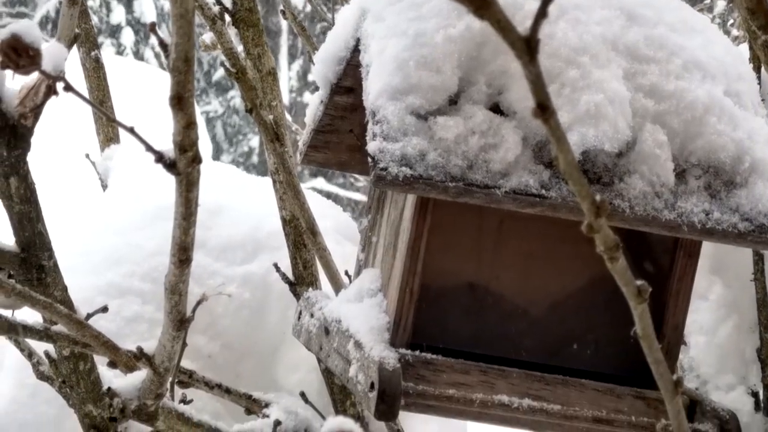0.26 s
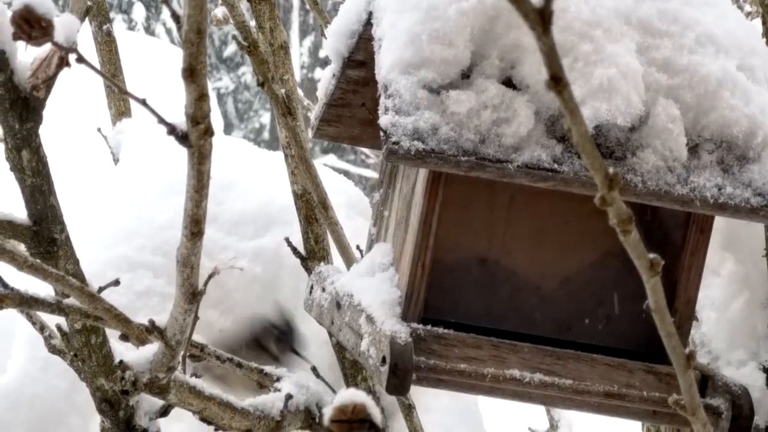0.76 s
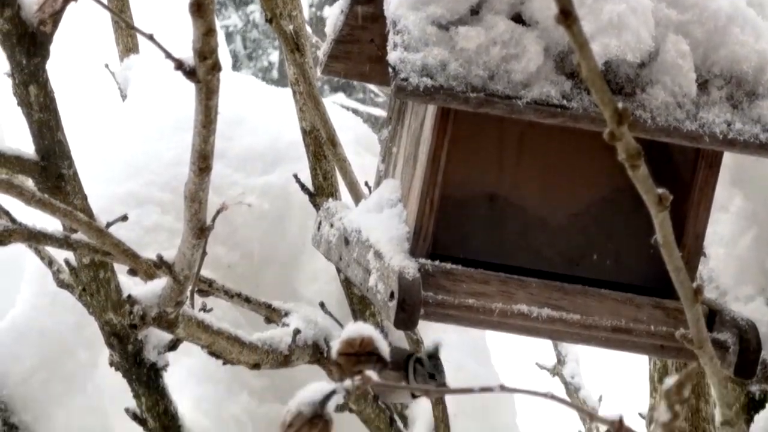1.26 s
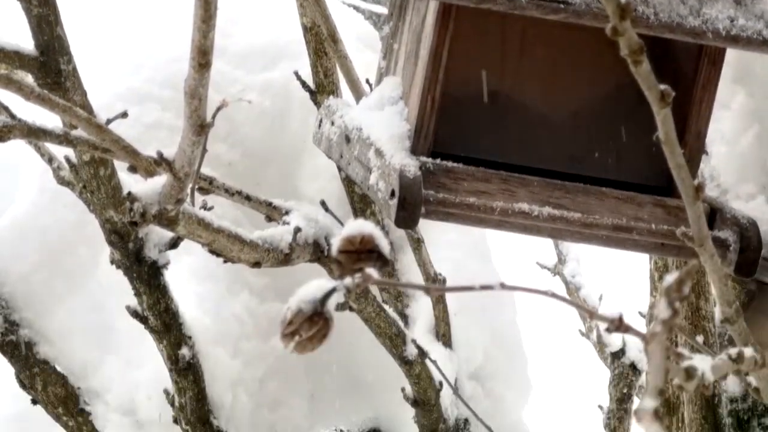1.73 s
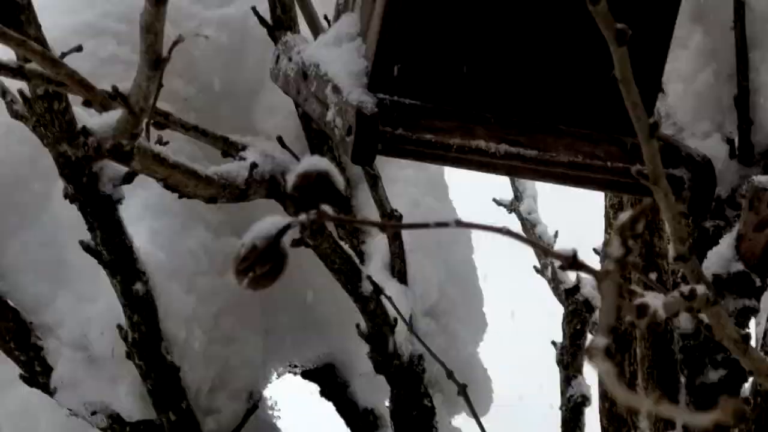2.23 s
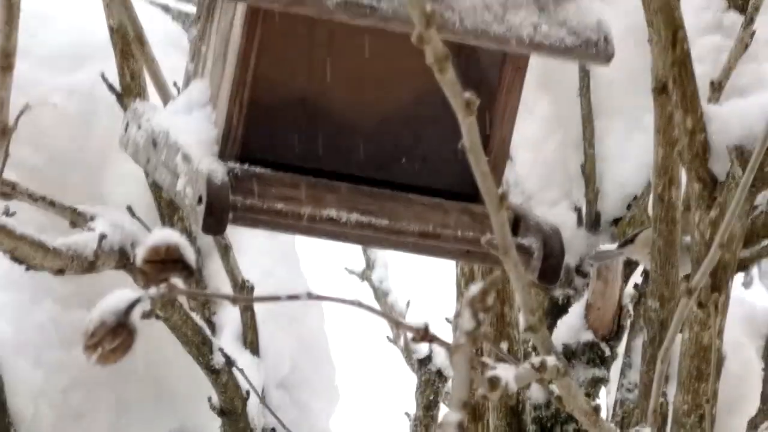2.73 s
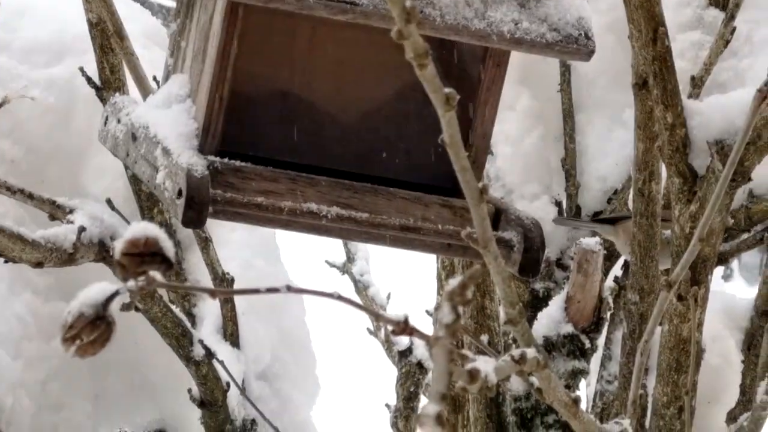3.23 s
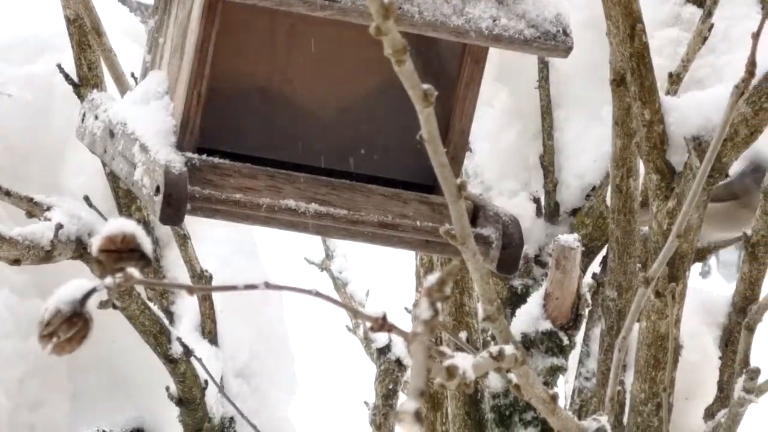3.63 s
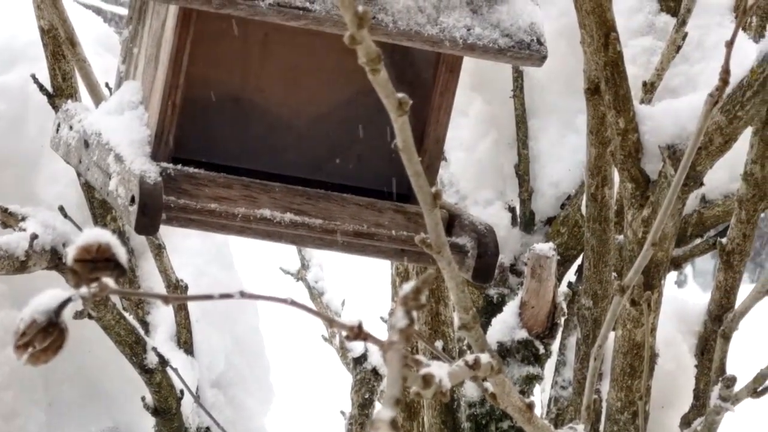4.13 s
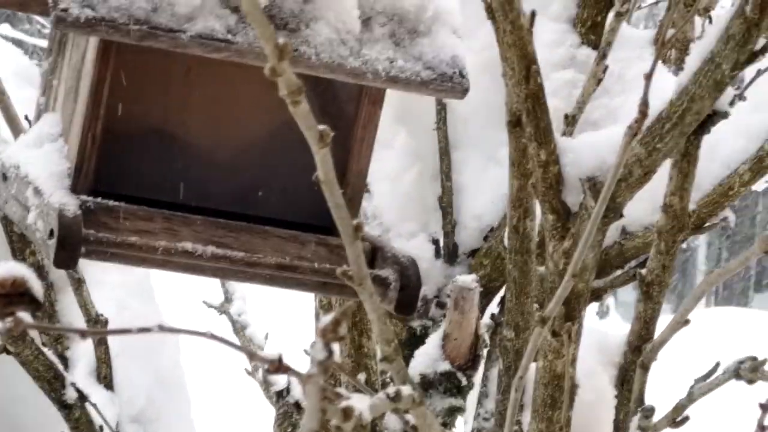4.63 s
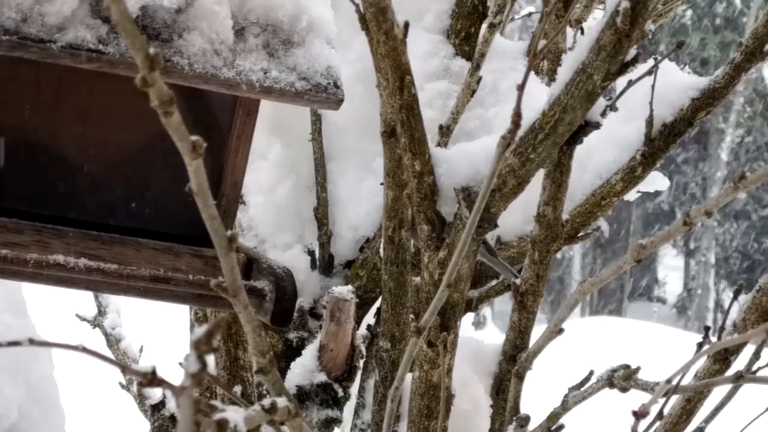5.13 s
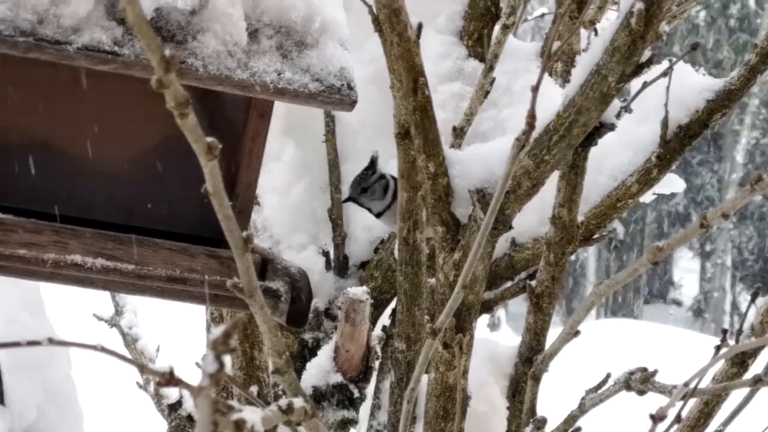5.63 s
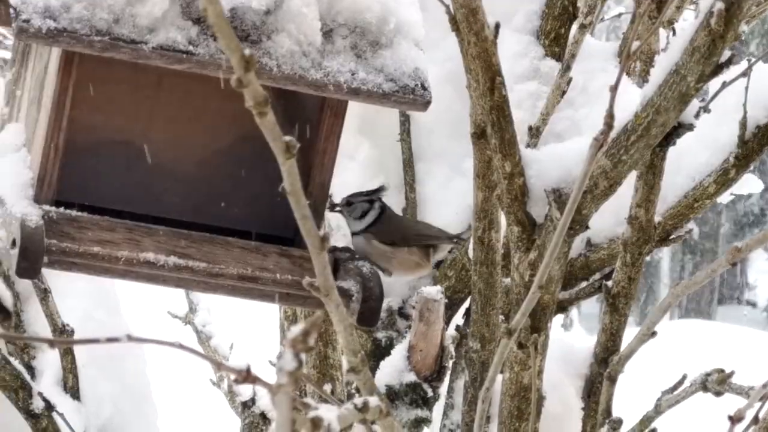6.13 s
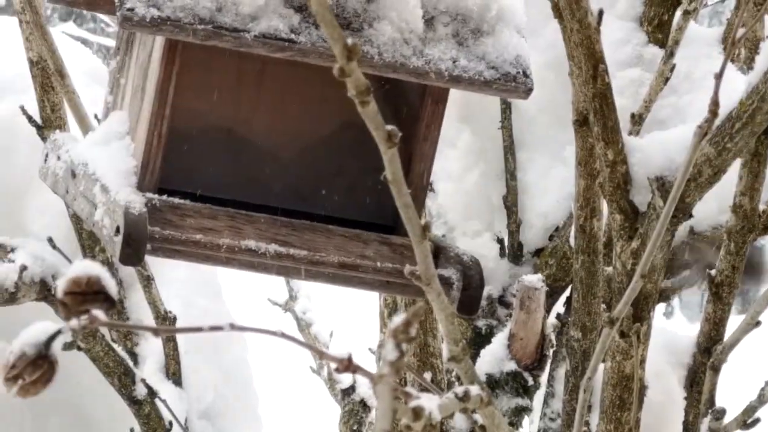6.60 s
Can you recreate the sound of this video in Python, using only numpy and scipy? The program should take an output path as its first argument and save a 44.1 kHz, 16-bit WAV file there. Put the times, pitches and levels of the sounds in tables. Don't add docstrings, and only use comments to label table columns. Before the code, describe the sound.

Close to a small stereo microphone, a bird trills quickly twice: eight notes at the very start, then a stronger run of thirteen near the middle, leaning right. Between and after come sparse distant whistles, churrs, tiny twig ticks, soft knocks, faint wing flutters and dull low pops on the left. Gentle wind rumble, far cars and steady hiss lie beneath, with a short outdoor echo.

```python
import sys
import numpy as np
from scipy import signal
from scipy.fft import rfft, irfft, next_fast_len
from scipy.io import wavfile
from scipy.ndimage import uniform_filter1d

SR = 44100
rng = np.random.default_rng(int(sys.argv[2]) if len(sys.argv) > 2 else 0)


def how_loud(loudness_db):
    steps = np.asarray(loudness_db, float) / 20
    return 10 ** steps


def dump(signal):
    limited = np.clip(np.atleast_2d(signal).T, -1, 1)
    pcm = np.round(limited * 32767).astype(np.int16)
    wavfile.write(sys.argv[1], SR, pcm)


N = 302526

# (frequency [Hz], density [dB per Hz])
HISS_SPECTRUM = [(88, -0.5), (150, -1.5), (405, -7), (881, -14), (1850, -14.5), (2200, -19), (2780, -15),
                 (3720, -19.5), (4790, -11.5), (6290, -20.5), (7640, -17), (9840, -36), (10800, -29.5),
                 (13200, -19), (15700, -18)]
# (frequency [Hz], correlation [-1..1])
PORT_LIKENESS = [(60, 0.21), (300, 0.42), (700, 0.094), (15000, .01)]
# (frequency [Hz], density [dB per Hz])
ROAD_SPECTRUM = [(150, -5), (400, -5.5), (800, -1), (1300, -12.5), (1900, -9), (2600, -19.5), (5000, -38)]
# (time nearest [s], level [dB], time to draw away [s])
PASSES = [
    (1.2, -73, 0.18),
    (2.35, -64, 0.53),
    (3.7, -74, 0.46),
    (4.8, -67, 0.32),
    (5.92, -60, 0.3),
    (6.8, -71, 1),
]
# (frequency [Hz], density [dB per Hz])
GUST_SPECTRUM = [(8, 1), (20, 1.5), (50, -8.5), (120, -11), (300, -39.5), (800, -46), (3000, -59)]
# (time strongest [s], level [dB], time to die away [s])
GUSTS = [(.6, -66, 0.62), (1.55, -62.5, 0.44), (2.6, -66.5, 0.96), (3.48, -51.5, 0.055),
         (3.86, -59.5, 0.075), (4.55, -60, 0.036), (4.8, -56, 0.14), (5.4, -67, 0.83), (6.1, -63, 0.062),
         (6.4, -64, 0.14), (6.86, -53, 0.1)]
# (frequency [Hz], density [dB per Hz])
RUB_SPECTRUM = [(15, -8), (50, 0.), (120, -6), (280, -16), (500, -30), (1000, -35), (3000, -50),
                (8000, -62)]
# (time [s], length [s], level [dB], left-right [dB])
HANDLING = [
    (3.43, 0.12, -50.5, 3.5),
    (4.1, 0.15, -63.5, 0),
    (1.1, 0.053, -63.5, 7),
    (3.81, 0.09, -57, -1),
    (6.72, 0.078, -73, -3),
]

# (time [s], peak [dB], ring [Hz], left-right [dB])
KNOCKS = [
    (1.435, -63, 601, 4),
    (1.599, -59.5, 680, 15),
    (1.685, -58.5, 888, 7),
    (1.865, -52, 795, 16.5),
    (1.921, -50.5, 960, -7.5),
    (4.908, -63, 559, -6),
]
# (time [s], peak [dB], left-right [dB])
TICKS = [(1.2865, -79, 3), (2.1243, -69, -1), (2.639, -59.5, 16), (2.676, -57, 16), (2.7136, -52, 14),
         (2.803, -63, 12), (2.95, -69, 0), (3.354, -68, 0), (2.817, -63, 17), (2.9966, -66, -2.0),
         (3.1447, -66, 3), (3.159, -63, 0), (1.875, -64, 0), (3.374, -63, 6), (3.437, -63, -1),
         (3.464, -60, -11), (3.5073, -56.5, 6), (3.5638, -65, 9), (3.5917, -66, -1.0), (4.612, -68, 3),
         (4.85, -63, 1), (4.96, -60, 1), (5.075, -59, 3), (5.13, -65, 1), (5.6435, -65, -6), (5.75, -67, 0),
         (5.886, -61, 1), (6.418, -60, 4)]
# (time [s], peak [dB], ring [Hz])
POPS = [(0.196, -55, 100), (1.254, -42.5, 117), (1.341, -37, 134), (1.555, -35.5, 141), (1.824, -38.5, 140),
        (1.892, -48.5, 159), (2.349, -42.5, 135), (2.458, -47, 152), (2.624, -52, 158), (3.142, -50, 181),
        (4.529, -40.5, 154), (4.605, -38, 146), (5.856, -49.5, 138), (6.411, -45.5, 134.3),
        (6.45, -44, 164)]

# (frequency [Hz], gain [dB])
PORT_COLOUR = [(1500, 5), (2200, 1.5), (3000, 8.5), (3900, 0), (4800, 11), (6200, 5), (7500, -3),
               (8200, -7), (8800, -26), (10300, -27), (11500, -21.5), (14000, -12)]
# (delay [s], left [dB], right [dB])
ECHOES = [(.0031, -3, -51), (.009, -14.5, -43), (.016, -12, -25), (.026, -17.5, -25)]
PORT_LAG_SAMPLES = 20

# (time [s], length [s], level [dB], left-right [dB])
FLUTTER = [
    (0.801, 0.034, -68.5, 0),
    (1.729, 0.2, -69.5, 3),
    (4.83, 0.36, -71.5, 0),
    (6.383, 0.062, -68, 1),
]
# (time [s], length [s], top [Hz], level [dB], left-right [dB])
ARCHES = [
    (0.804, 0.021, 1915, -70, 1),
    (2.404, .085, 4600, -74, 0),
    (3.08, 0.086, 4910, -59, -16),
    (4.56, 0.14, 6140, -77.5, -6),
    (5.948, 0.1, 4930, -68.5, -9),
    (5.775, 0.048, 4660, -76, -4),
]
ARCH_START, ARCH_END = 0.95, .91
ARCH_TOP_AT, ARCH_FADE_DB = 0.35, -3.5
# (time [s], length [s], from [Hz], to [Hz], level [dB])
THIN = [
    (1.942, 0.21, 6200, 7850, -69.5),
]
QUICK = [(1.35, 0.04, 7600, 4200, -71), (1.665, 0.066, 7100, 6390, -62), (5.03, 0.04, 3500, 4780, -70),
         (5.31, 0.048, 4460, 4910, -62), (4.84, 0.023, 4440, 4840, -68), (5.368, 0.035, 4250, 4690, -66.5),
         (6.487, 0.049, 3940, 4170, -63.5), (2.128, .04, 4070, 4500, -76), (5.448, 0.17, 7580, 7050, -70.5),
         (6.718, 0.034, 5310, 4880, -56), (6.8, 0.055, 5200, 4720, -73)]
RISING = [
    (1.8, .075, 1630, 2010, -74.5),
    (1.82, .02, 4800, 5100, -60),
    (1.77, .045, 3700, 4300, -70),
    (5.7, 0.042, 2850, 3900, -70),
    (4.94, 0.045, 3050, 3500, -69),
    (4.875, .05, 2950, 3200, -73),
    (4.98, .05, 3500, 3900, -74),
    (6.53, 0.041, 4150, 4280, -63.5),
    (2.265, .035, 4400, 4000, -77),
]
RIGHT = [(1.18, .05, 7200, 7100, -73.5), (1.72, 0.098, 6450, 5650, -66), (1.815, .018, 6200, 4950, -63),
         (1.636, 0.015, 7700, 7000, -71), (3.162, 0.07, 4400, 4330, -61.5),
         (3.217, 0.043, 4220, 4150, -66.5), (3.19, .03, 4400, 4780, -72), (6.565, 0.049, 4260, 4080, -73.5),
         (4.59, 0.13, 4980, 4880, -75), (3.605, .08, 4550, 4700, -77), (2.47, .13, 7850, 7700, -82),
         (4.52, .02, 7000, 6200, -72)]
LEFT = [(1.487, 0.056, 4570, 3200, -70.5), (1.678, 0.064, 5400, 5300, -67.5),
        (1.805, 0.11, 4860, 4820, -66.5), (1.74, 0.068, 5080, 4930, -66), (1.85, 0.04, 5550, 5800, -66),
        (1.872, .014, 4540, 4400, -73), (2.053, .016, 4050, 4000, -76), (1.92, .1, 4810, 4720, -74),
        (2.165, 0.084, 4490, 4400, -77), (2.551, 0.099, 3990, 4360, -78), (3.302, 0.04, 3290, 3190, -68.5),
        (4.851, 0.013, 4300, 3650, -62), (5.305, .06, 4050, 3890, -69), (5.35, 0.025, 4500, 4330, -65),
        (4.98, .045, 1827, 1866, -79), (5.03, .035, 1950, 2600, -78), (5.055, .08, 4770, 4720, -72),
        (5.065, 0.062, 2630, 2720, -73), (5.42, 0.031, 3180, 2990, -65.5), (6.69, 0.022, 5080, 4720, -60.5),
        (6.762, 0.021, 4600, 5210, -61)]
CHURRS = [(0.799, 0.075, 7200, 7500, -71.5), (.803, 0.0254, 3400, 4400, -65), (1.5, 0.057, 4700, 3800, -72),
          (1.742, 0.046, 3500, 3800, -70), (1.74, 0.2, 5800, 5400, -65.5), (1.67, .11, 6900, 6700, -76),
          (5.19, .035, 4850, 4850, -71), (3.451, 0.14, 7600, 7260, -71), (4.839, 0.41, 4860, 4900, -73),
          (6.392, 0.05, 5390, 4750, -61.5), (6.44, .05, 4300, 4250, -65.5), (6.395, .1, 5550, 5350, -69),
          (6.5, 0.078, 5400, 5700, -73), (5.39, .04, 4600, 4800, -72), (6.68, 0.047, 4900, 4800, -65)]
# (haste [1 = even glide], fade over the call [dB], left-right [dB])
MANNERS = [
    (26, -12, -17),
    (3.5, -6, -6.5),
    (0.547, -4, 5),
    (0.79, -1.5, -10),
    (1.06, -6.5, 11.5),
    (1.2, -9.5, -7),
]
# (frequency [Hz], density [dB per Hz])
BUZZ_SPECTRUM = [(2500, -28), (3900, -15), (4450, -2), (4800, -2.5), (5200, -11), (6300, -13), (6900, -24),
                 (7350, 0.5), (7750, -10), (8300, -13.5), (8900, -24), (10000, -37), (14000, -31)]
BUZZ_DB, BUZZ_SAG_S, BUZZ_SAG_DB_PER_S = -57, 0.43, 30
BUZZ_END_S, BUZZ_CUT_DB_PER_S = 0.534, 1600

# (time [s], left-right [dB])
PERCH = [
    (0, -2),
    (.12, -5),
    (.8, -2.5),
    (2.3, 12),
    (3.25, -4),
    (3.73, -1.5),
    (3.9, -17),
    (6.86, -30.5),
]
# (time [s], length [s], start [Hz], top [Hz], level [dB])
CHIPS = [
    (3.242, 0.0206, 4770, 7070, -41),
    (6.614, 0.0305, 6820, 7560, -45.5),
]
# (share of length, share of the bend, level [dB])
CHIP_SHAPE = [(0, 0, -7), (.12, 0.71, -7), (.3, 0.98, -4), (.6, 0.81, -6), (.82, .45, -7.5), (1, 0, -18)]
# (time [s], length [s], top [Hz], level [dB])
SEEPS = [
    (0.715, 0.034, 7700, -56.5),
    (5.784, 0.044, 8820, -70),
    (6.119, 0.078, 8350, -63),
    (6.232, 0.054, 8340, -63.5),
    (6.365, 0.056, 8490, -66),
    (6.673, 0.028, 7770, -66),
]
SEEP_SHAPE = [(0, 0, -4), (.1, .75, -6.5), (.22, 1, -6), (.62, 0.83, -4), (.85, .55, -4), (1, 0, -13)]
CHIP_END, SEEP_START, SEEP_END = 0.854, 0.77, .885
# (time [s], length [s], from [Hz], to [Hz], level [dB])
GRACE = [
    (3.729, 0.0167, 2260, 2820, -58),
    (3.766, 0.024, 2440, 2880, -55),
    (6.026, 0.043, 7760, 8230, -69.5),
    (1.815, .021, 3250, 3320, -67),
    (1.833, .044, 3340, 4130, -66),
    (3.256, .009, 6890, 5520, -52),
]
LIFTS = [
    (2.33, .026, 6900, 7900, -65),
    (5.949, 0.033, 7200, 8600, -71.5),
]

# (time of arch top [s], level [dB], top pitch [Hz], rasp under the note [dB])
TRILL = [(0.0469, -39.5, 3563, -14), (0.0923, -38.5, 3590, -8.5), (0.1387, -39, 3750, -8),
         (0.1888, -37.5, 3780, -4.5), (0.2434, -38.5, 3690, -10), (0.299, -38.5, 3780, -8),
         (0.3576, -38.5, 3724, -6), (0.421, -36.5, 3653, -14), (3.745, -37.5, 3655, -23.5),
         (3.7874, -34.5, 3500, -13), (3.8305, -34, 3640, -13), (3.877, -33, 3750, -10),
         (3.9308, -32.5, 3730, -6), (3.9896, -32, 3886, -10), (4.043, -31.5, 3960, -9.5),
         (4.104, -32.5, 3790, -9.5), (4.1663, -32.5, 3864, -13.5), (4.2282, -33.5, 3790, -9),
         (4.2905, -33, 3764, -11.5), (4.355, -32.5, 3835, -7.5), (4.426, -34, 3707, -11)]
BRIGHT_DB = [6, 3, -3, 3, 0, 11, 6, 6, 8.5, 3, 6.5, 1, 4, 2, -7, -6, -7, -11, -5, 3, 8]
CLIMB_STRETCH = [1.35, 1.1, 1.01, 1.05, .95, 1.01, .95, 1.1, 1.024, 1.08, 1.056, 1.1, 1.08, 1.08, 1.01,
                 1.08, 1.05, 1.09, 1.08, 1.12, 1.1]
SNAPS_DB = [-11, -13, -19, -11, -13, -6, -14, -7, -15, -18, -13, -18, -14, -16, -21, -20, -19, -24, -20, -9,
            -6]
# (multiple of pitch, level [dB])
TRILL_PARTIALS = [(.5, -34.5), (1.5, -26.5), (2, -23.5), (3, -18.5), (3.5, -29), (4, -27.5)]
# (frequency [Hz], extra left-right [dB])
LEANS = [
    [(3000, -1.1), (4000, -2.5), (4800, -4.5), (6000, 0), (9000, 3)],
    [(3000, 0.3), (4000, 0.5), (4600, 6), (5500, 6), (7000, 2.5), (10000, 4.5)],
]
FALL_S, FALL_SHARE, FIRST_FALL_SHARE, CLIMB_SHARE = 0.00822, 0.257, 0.359, .23
RASP_HZ, FIRST_RASP_HZ = 1603, 1553
WALL_S, WALL_DB, FIRST_WALL_DB = .0155, -30, -14
ROOF_S, ROOF_DB, FIRST_ROOF_DB = .0016, -14, -7.5
BREATH_DB, SNAP_S, SNAP_AT_S = -18.5, 0.0018, 0.007
HALF_LINE_DB = 21
OPENING_RISE_S, LONGEST_RISE_S, RISE_PER_GAP, SHORTEST_GAP_S = 0.00773, .0155, 0.4165, 0.02243
FIRST_TRILL_STRETCH = 1.2


def evened(x):
    return x / np.sqrt(np.mean(x ** 2) + 1e-20)


def read(points, hz):
    f, value = np.transpose(points)
    return np.interp(np.log(hz + 1), np.log(f + 1), value)


def add(mix, s, sound, pan_db):
    part = mix[:, max(round(s * SR), 0):][:, :len(sound)]
    part += how_loud(np.array([[.5], [-.5]]) * pan_db) * sound[:part.shape[1]]


def drift(length, width_hz):
    chance = uniform_filter1d(rng.standard_normal(length), size=20)
    return evened(signal.lfilter([1], [1, -np.exp(-2 * np.pi * width_hz / SR)], chance))


def noise(spectrum, same, patchy_db, size):
    frames, hz = 4 * N // size + 5, np.fft.rfftfreq(size, 1 / SR)
    a, b, c, d, patches = rng.standard_normal((frames, len(hz), 5)).T
    patches = uniform_filter1d(patches, size=10, axis=0)
    patches = evened(uniform_filter1d(patches, size=10, axis=1))
    same = np.clip(read(same, hz), -1, 1)[:, None]
    left = a + 1j * b
    right = same * left + np.sqrt(1 - same ** 2) * (c + 1j * d)
    z = np.array([left, right]) * how_loud(read(spectrum, hz)[:, None] + patchy_db * patches)
    return evened(signal.istft(z, nperseg=size, noverlap=3 * size // 4)[1][:, :N])


def coloured(x, low_hz, top_hz):
    hz = np.fft.rfftfreq(len(x), 1 / SR)
    gain = how_loud(read(PORT_COLOUR, hz)) / (1 + (low_hz / (hz + 1)) ** 6) / (1 + (hz / top_hz) ** 4)
    return evened(irfft(rfft(x) * gain, len(x)))


def swells(rows, rest_db):
    t = np.arange(N) / SR
    power = sum((how_loud(db) / (1 + ((t - s) / span_s) ** 2)) ** 2 for s, db, span_s in rows)
    return np.sqrt(how_loud(2 * rest_db) + power)


def hiss():
    return noise(HISS_SPECTRUM, PORT_LIKENESS, 1.3, size=1024) * how_loud(-67.5 + 4.0)


def road():
    return noise(ROAD_SPECTRUM, PORT_LIKENESS, 2.55, size=1024) * swells(PASSES, -85) * how_loud(-5.0)


def wind():
    rumble = noise(GUST_SPECTRUM, [(20, 0.55), (100, 0.65)], 2.6, size=2048)
    return rumble * swells(GUSTS, -88) * how_loud(2.0 + 1.5 * drift(N, 16))


def handling():
    grip = np.zeros((2, N))
    for s, length_s, db, pan_db in HANDLING:
        add(grip, s, how_loud(db) * np.hanning(round(length_s * SR)), pan_db)
    return noise(RUB_SPECTRUM, [(20, .8), (300, .6)], 2.5, size=1024) * grip * how_loud(3 * drift(N, 30))


def twigs():
    mix, t = np.zeros((2, N)), np.arange(0, .012, 1 / SR)
    for s, db, hz, pan_db in KNOCKS:
        knock = np.sin(2 * np.pi * hz * t) * np.exp(-((t - .003) / 0.0011) ** 2)
        add(mix, s, how_loud(db + 4) * knock, pan_db)
    for s, db, pan_db in TICKS:
        snap = uniform_filter1d(rng.standard_normal(len(t)), size=3) * np.exp(-t / 0.001)
        add(mix, s, how_loud(db - 10.0) * coloured(snap, 1260, 18000), pan_db)
    return mix


def flakes():
    mix, t = np.zeros((2, N)), np.arange(0, .03, 1 / SR)
    for s, db, hz in POPS:
        u = (t - .0075) * hz
        pull = -.6 * np.exp(np.minimum(u, 0) / 0.074)
        swing = 1.32 * np.exp(-u / 0.4) * np.sin(2 * np.pi * 0.75 * u ** 2 / (abs(u) + 0.0067))
        swing -= 1.72 * np.exp(-u / 0.095)
        add(mix, s, how_loud(db - 4) * uniform_filter1d(np.where(u < 0, pull, swing), size=36), 26)
    return mix


def garden(x, wet_db, t60_s):
    taps = np.zeros((2, SR // 2))
    at = np.arange(200, SR // 2 - 20, 20) + rng.integers(0, 20, (2, (SR // 2 - 201) // 20))
    np.put_along_axis(taps, at, rng.choice([-1., 1.], at.shape), 1)
    taps *= how_loud(-60 * np.arange(SR // 2) / SR / t60_s)
    taps *= how_loud(wet_db) / np.linalg.norm(taps[0])
    for s, left_db, right_db in ECHOES:
        taps[:, round(s * SR)] += how_loud(np.array([left_db, right_db]))
    direct = np.array([np.roll(x[0], PORT_LAG_SAMPLES), x[1]])
    return direct + signal.fftconvolve(x.mean(0)[None], taps, axes=1)[:, :N]


def whistle(rows, waver, waver_db):
    s, hz, db = np.transpose(rows)
    t = np.arange(s[0], s[-1], 1 / SR)
    hz = uniform_filter1d(np.interp(t, s, hz), size=100, mode="nearest")
    hz = hz * (1 + waver * uniform_filter1d(drift(len(t), 123), size=50))
    level = how_loud(np.interp(t, s, db) + 3 + waver_db * uniform_filter1d(drift(len(t), 83), size=50))
    return s[0], level * np.sin(2 * np.pi * np.cumsum(hz) / SR) * signal.windows.tukey(len(t), .15)


def glide(s, length_s, from_hz, to_hz, db, haste, fade_db):
    u = np.linspace(0, 1, num=40)
    hz = to_hz + (from_hz - to_hz) * (1 - u) ** haste
    return np.transpose([s + u * length_s, hz, db + fade_db * u ** 2])


def arch(s, length_s, top_hz, db):
    u = np.linspace(0, 1, num=12)
    climb = (1 - ARCH_START) * (1 - u / ARCH_TOP_AT) ** 2
    fall = (1 - ARCH_END) * (abs(u - ARCH_TOP_AT) / (1 - ARCH_TOP_AT)) ** 1.36
    off = np.where(u < ARCH_TOP_AT, climb, fall)
    return np.transpose([s + u * length_s, top_hz * (1 - off), db + ARCH_FADE_DB * u ** 2])


def chip(s, length_s, start_hz, top_hz, end_hz, db, shape):
    share, bend, lift_db = np.transpose(shape)
    foot_hz = np.where(np.arange(len(share)) < bend.argmax(), start_hz, end_hz)
    return np.transpose([s + share * length_s, foot_hz + bend * (top_hz - foot_hz), db + lift_db])


def wings(mix):
    for s, length_s, db, pan_db in FLUTTER:
        size = round(length_s * SR)
        beat = how_loud(db + 3.7 * drift(size, 60)) * signal.windows.tukey(size, .5)
        add(mix, s, beat * coloured(rng.standard_normal(size), 2760, 6400), pan_db)


def far_birds():
    mix = np.zeros((2, N))
    wings(mix)
    for *row, pan_db in ARCHES:
        add(mix, *whistle(arch(*row), .007, 2.4), pan_db)
    plain = (.007, 2.4)
    wavers = [(.016, 4), plain, plain, plain, plain, (.06, 4.7)]
    birds = [THIN, QUICK, RISING, RIGHT, LEFT, CHURRS]
    for calls, waver, (haste, fade_db, pan_db) in zip(birds, wavers, MANNERS):
        for row in calls:
            add(mix, *whistle(glide(*row, haste, fade_db), *waver), pan_db)
    return garden(how_loud(-1.0) * mix, -6.5, 0.36)


def rasping_bird():
    t = np.arange(N) / SR
    effort_db = BUZZ_DB - BUZZ_SAG_DB_PER_S * np.maximum(t - BUZZ_SAG_S, 0)
    effort_db -= BUZZ_CUT_DB_PER_S * np.maximum(t - BUZZ_END_S, 0)
    buzz = noise(BUZZ_SPECTRUM, [(1000, .6), (9000, .5)], 1.2, size=512)
    return buzz * how_loud(effort_db + 3.5 + 1.5 * drift(N, 90)) * how_loud(np.array([[-1.5], [1.5]]))


def facing(s):
    return np.interp(s, *np.transpose(PERCH))


def near_calls():
    mix = np.zeros((2, N))
    curves = [chip(s, length_s, start_hz, top_hz, CHIP_END * top_hz, db, CHIP_SHAPE)
              for s, length_s, start_hz, top_hz, db in CHIPS]
    curves += [chip(s, length_s, SEEP_START * top_hz, top_hz, SEEP_END * top_hz, db, SEEP_SHAPE)
               for s, length_s, top_hz, db in SEEPS]
    curves += [glide(*row, 1, 0) for row in GRACE]
    for curve in curves:
        add(mix, *whistle(curve, .008, 2.6), facing(curve[0][0]))
    for row in LIFTS:
        add(mix, *whistle(glide(*row, 6.8, -7), .008, 2.4), facing(row[0]))
    return mix


def lean(x, points):
    size = next_fast_len(N + SR // 10, real=True)
    lean_db = read(points, np.fft.rfftfreq(size, 1 / SR))
    return irfft(rfft(x, size) * how_loud(np.array([[.5], [-.5]]) * lean_db), size)[:, :N]


def trill_arch(t, u, first, top_s, top_hz, bright_db, gate):
    climb = CLIMB_SHARE * (1.1 if first else 1) * np.sin(np.pi / 2 * np.clip(u, -1, 0)) ** 2
    fall = (FIRST_FALL_SHARE if first else FALL_SHARE) * np.clip(u, 0, 1.2) ** 2
    sag = np.where(t < 0, climb, fall)
    hz = top_hz * (1 - sag)
    turns = np.cumsum(hz) / SR + rng.random()
    effort = gate * how_loud(-2 * sag + 1.3 * drift(len(t), 200))
    shut = how_loud(15 * np.clip(u, -1, .7) + 6 * np.tanh(drift(len(t), 350)))
    tone = np.cos(2 * np.pi * turns)
    for k, db in TRILL_PARTIALS:
        half_line = first and k == 1.5
        level_db = db + read(PORT_COLOUR, k * hz)
        if k > 2:
            level_db = level_db + bright_db - 22 * sag
        if half_line:
            level_db = level_db + HALF_LINE_DB - 60 * sag - 21 * top_s
        flicker = 1 if k < 1 or half_line else shut
        tone += how_loud(level_db) * flicker * np.cos(2 * np.pi * k * turns)
    return tone * effort


def trill_rasp(t, u, first, rasp_db, rise_s, start_s):
    swell = np.clip((t - start_s) / rise_s / (1.5 if first else 1.2), 0, 1) ** (2.6 if first else 1.5)
    lead = swell * np.clip((-.36 - u) / .2, 0, 1)
    hz = (FIRST_RASP_HZ if first else RASP_HZ) * rng.uniform(.98, 1.02) * (1 + .032 * drift(len(t), 300))
    turns = np.cumsum(hz) / SR
    rasp = sum(how_loud(db) * np.cos(2 * np.pi * k * turns) for k, db in [(1, -18), (2, -10.5), (3, 1.0)])
    return rasp * how_loud(rasp_db + 3 + 5 * np.tanh(drift(len(t), 200))) * lead


def trill_note(top_s, db, top_hz, rasp_db, pan_db, rise_s, bright_db, snap_db):
    t = np.arange(-.04, .036, 1 / SR)
    u = np.where(t < 0, t / rise_s, t / FALL_S)
    first = top_s < 1
    gate = np.clip(((1.15 if first else .88) + u) / 0.26, 0, 1) ** 2 * np.clip((1.05 - u) / 0.27, 0, 1)
    start_s = -2.1 * rise_s
    tone = trill_arch(t, u, first, top_s, top_hz, bright_db, gate)
    rasp = trill_rasp(t, u, first, rasp_db, rise_s, start_s)
    breath = coloured(rng.standard_normal(len(t)), 1430, 9000)
    breath *= how_loud(BREATH_DB - 3 * first + 2.5 * drift(len(t), 110))
    breath *= np.clip((t - start_s) / .006, 0, 1) * np.clip((.016 - t) / .008, 0, 1) * (1 - .6 * gate)
    snap = coloured(rng.standard_normal(len(t)), 2900, 11000) * np.exp(-((t - SNAP_AT_S) / SNAP_S) ** 2)
    note = tone + rasp + breath + how_loud(snap_db) * snap
    note += how_loud(FIRST_WALL_DB if first else WALL_DB) * np.roll(tone, round(WALL_S * SR))
    note += how_loud(FIRST_ROOF_DB if first else ROOF_DB) * np.roll(note, round(ROOF_S * SR))
    return top_s + t[0], how_loud(db + pan_db / 2 + (1.5 if first else 4.0)) * note, pan_db


def trills():
    pair = np.zeros((2, 2, N))
    gaps_s = np.diff(np.transpose(TRILL)[0], prepend=-1)
    for row, stretch, bright_db, snap_db, gap_s in zip(TRILL, CLIMB_STRETCH, BRIGHT_DB, SNAPS_DB, gaps_s):
        top_s = row[0]
        rise_s = min(RISE_PER_GAP * (gap_s - SHORTEST_GAP_S), LONGEST_RISE_S)
        if gap_s > 1:
            rise_s = OPENING_RISE_S
        rise_s *= stretch * (FIRST_TRILL_STRETCH if top_s < 1 else 1)
        add(pair[int(top_s > 1)], *trill_note(*row, facing(top_s), rise_s, bright_db, snap_db))
    return sum(lean(trill, points) for trill, points in zip(pair, LEANS))


def scene():
    background = hiss() + road() + wind() + handling()
    near = garden(near_calls() + trills(), -12.5, 0.17)
    return background + twigs() + flakes() + far_birds() + rasping_bird() + near


def roll_off(x):
    return signal.sosfilt(signal.butter(12, 15850, fs=SR, output="sos"), x)


def record(dry):
    lowpass = signal.firwin(numtaps=511, cutoff=15790, window=("kaiser", 10), fs=SR)
    mix = signal.oaconvolve(dry, lowpass[None], "same")
    return roll_off(mix)


dry = scene()
out = record(dry)
dump(out)
```